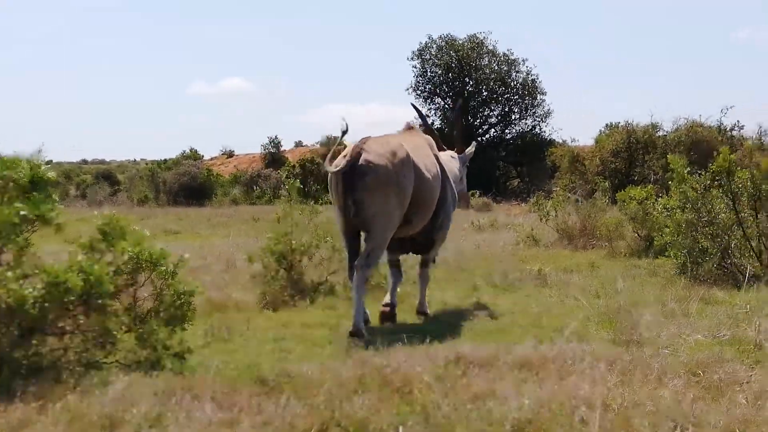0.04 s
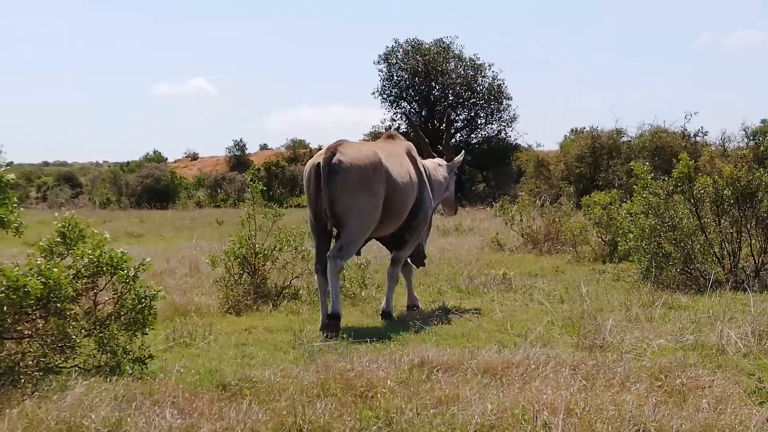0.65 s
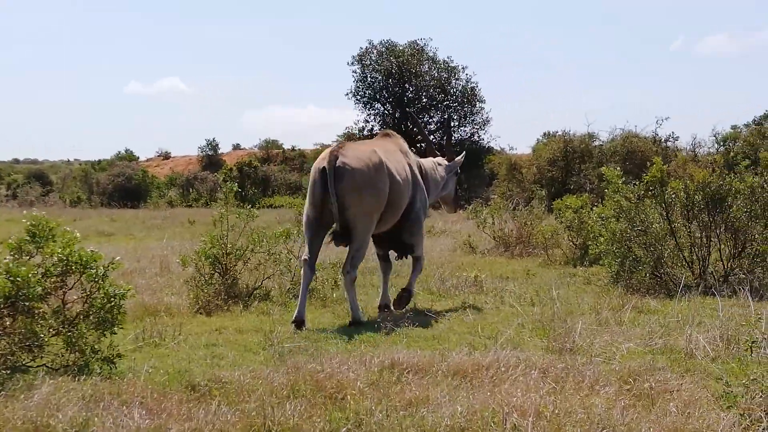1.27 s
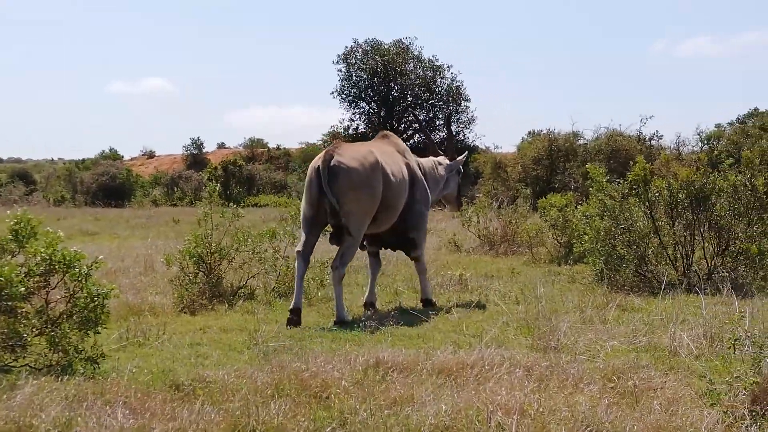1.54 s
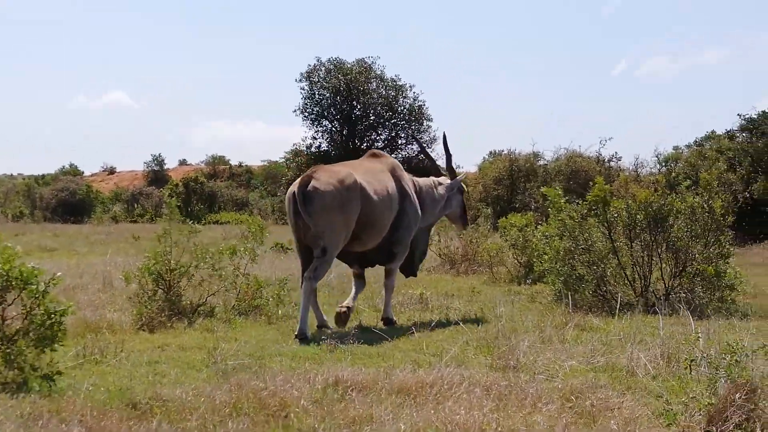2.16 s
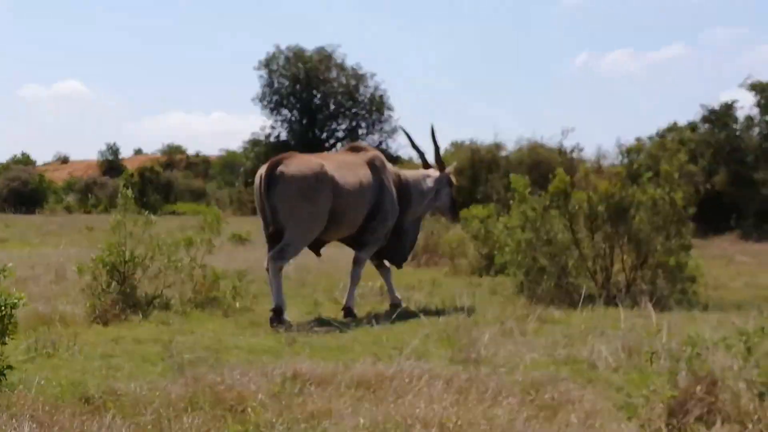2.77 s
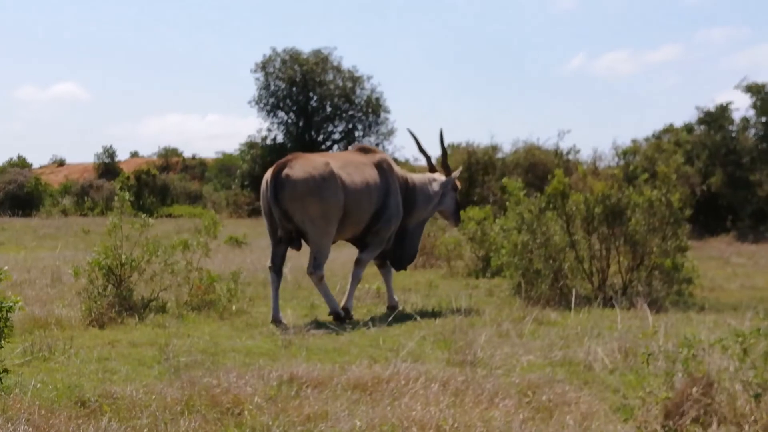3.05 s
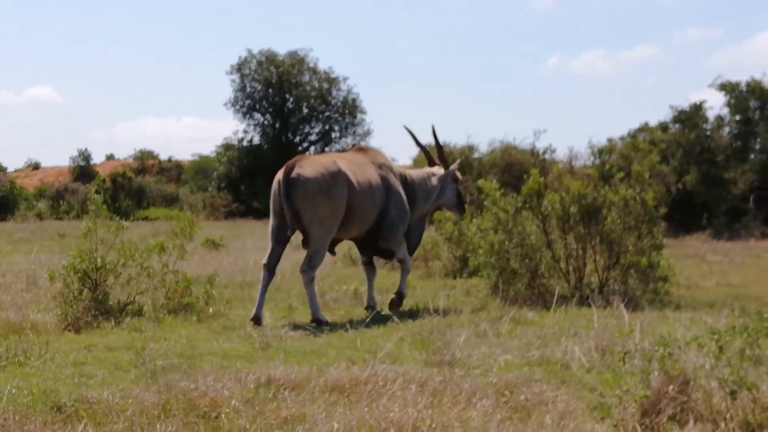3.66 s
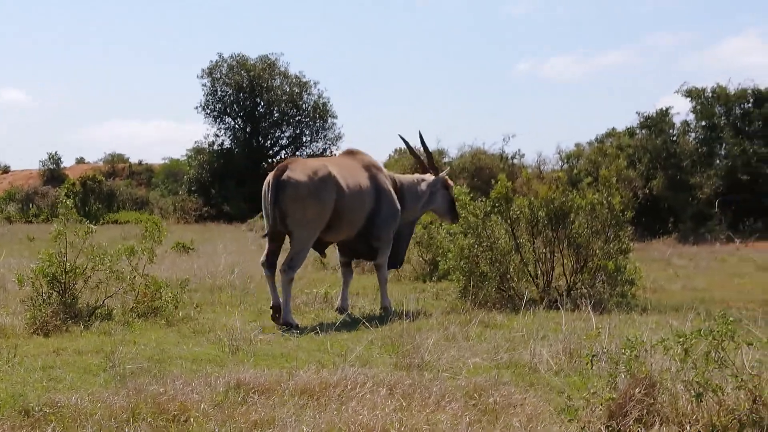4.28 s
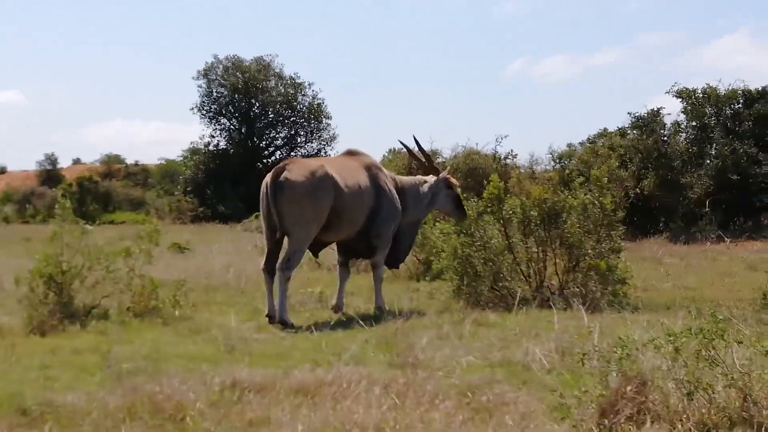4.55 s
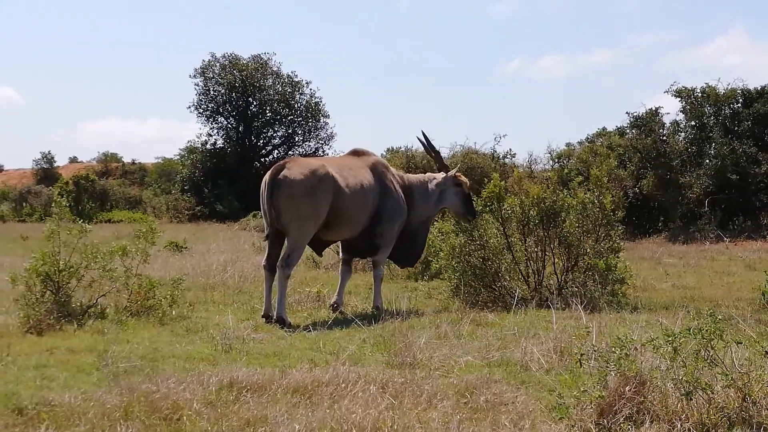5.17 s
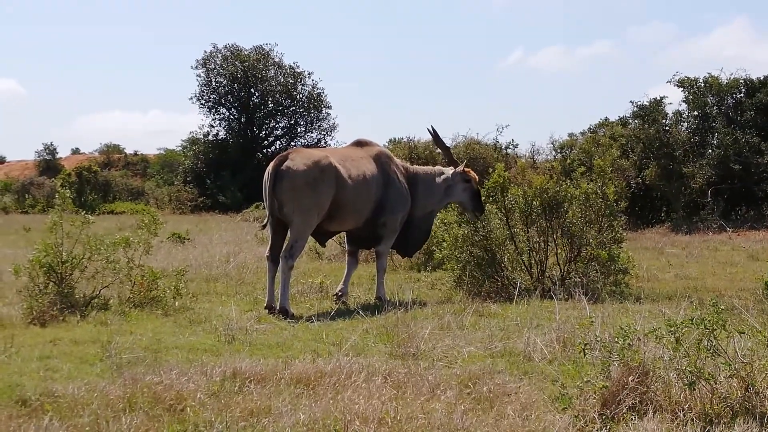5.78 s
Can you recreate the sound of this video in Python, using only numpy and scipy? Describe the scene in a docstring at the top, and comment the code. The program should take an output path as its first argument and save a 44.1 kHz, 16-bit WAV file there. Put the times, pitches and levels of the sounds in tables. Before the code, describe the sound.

A large antelope walks through quiet bushland under a steady hush and light wind rumble. Its leg joints give sharp, dry clicks, each a hollow knock with a bright crack, at about 0.1, 1.1, 2.1 and 3.5 seconds; the second and fourth are the strongest. Duller knocks come at 3.1 and 5.1 seconds. A faint insect ticks very high and fast on the left throughout, wavering in level. Grass swishes softly against the legs, mostly in the first second and a half, and hooves faintly pat the turf and snap stalks. Leaves rustle very faintly around 2 seconds. A low gust thumps the microphone at about 2.3 seconds, with smaller bumps between 4 and 5. From 5.3 seconds to the end, wind buffets the microphone hard, and one short, dry scuff sounds close by at 5.6.

```python
"""A large antelope walks away through dry bushland. From the start, over a steady hush, light wind rumbles
at the microphones, grass rubs along the legs and an insect's wing strokes tick high and fast on the left.
A tendon snaps over each foreleg joint as it takes the weight, exciting the leg's damped modes; hooves pat
the turf and break stalks. Leaves rustle softly around 2 s. Near the end turbulent eddies buffet the
microphones hard, and one dry scuff sounds close by."""
import sys
import numpy as np
from scipy import signal
from scipy.fft import rfft, irfft, next_fast_len
from scipy.io import wavfile
from scipy.ndimage import uniform_filter1d

SR = 44100
rng = np.random.default_rng(int(sys.argv[2]) if len(sys.argv) > 2 else 0)


def wav_record(signal):
    """Record a signal, one row per channel, as 16-bit PCM in the file named by sys.argv[1]."""
    frames = np.transpose(np.atleast_2d(signal))
    bounded = np.clip(frames, -1, 1)
    # unit amplitude maps onto the largest positive 16-bit level
    quanta = np.round(bounded * 32767).astype(np.int16)
    wavfile.write(sys.argv[1], SR, quanta)


N = 261072
T = np.arange(N) / SR


def amp(db):
    """Amplitude ratio of a level in decibels."""
    return 10 ** (np.asarray(db) / 20)


def unit(x):
    """Normalisation to rms 1."""
    return x / np.sqrt(np.mean(x ** 2) + 1e-20)


def spectrum_at(points, hz):
    """Interpolation on a logarithmic frequency axis."""
    frequencies, values = np.transpose(points)
    return np.interp(np.log(hz + 1), np.log(frequencies + 1), values)


def panned(db):
    """Channel gains for a level difference, left minus right."""
    return amp(np.array([[db], [-db]]) / 2)


def add(mix, start, sound):
    """Superposition of a sound on the mix from a start time in seconds."""
    part = mix[:, max(round(start * SR), 0):][:, :sound.shape[1]]
    part += sound[:, :part.shape[1]]


def noise_pair(correlation, size=N):
    """Two channels of white noise with a given correlation."""
    a, b = rng.standard_normal((2, size))
    return np.array([a, correlation * a + np.sqrt(1 - correlation ** 2) * b])


def filtered(x, response):
    """Linear filtering: the spectrum is multiplied by a frequency response."""
    size = next_fast_len(x.shape[-1], real=True)
    hz = np.fft.rfftfreq(size, 1 / SR)
    return irfft(rfft(x, size) * response(hz), size)[..., :x.shape[-1]]


def hiss(spectrum, correlation, size=N):
    """Spectrally shaped stereo noise of rms 1."""
    return unit(filtered(noise_pair(correlation, size), lambda hz: amp(spectrum_at(spectrum, hz))))


def drift(bandwidth_hz):
    """Random modulation of rms 1, lying mostly below the given frequency."""
    points = rng.standard_normal(4096)
    return unit(np.interp(T * bandwidth_hz * 2, np.arange(len(points)), points))


def burst(rise, decay, size):
    """Envelope of linear attack and exponential decay, both in seconds."""
    t = np.arange(size) / SR
    return np.minimum(t / rise, 1) * np.exp(-np.maximum(t - rise, 0) / decay)


# Distant hush: (frequency [Hz], relative level [dB])
AIR_SPECTRUM = [(120, 3), (200, 4), (350, -3.5), (600, -10.5), (900, -7), (1300, -6), (2000, -8),
                (2600, -11), (3300, -8.5), (5000, -11), (7500, -12), (10200, -8), (12500, -15),
                (16000, -19.5)]


def air(level_db=-64.5, waver_db=0.35):
    """Diffuse field: the hush of open country is almost uncorrelated between the channels."""
    return amp(level_db + waver_db * drift(1.17)) * hiss(AIR_SPECTRUM, 0.073)


def eddies(corner_hz, size=N, slope=4.61, low_hz=40, lag_rad=2.49, lag_hz=260):
    """Turbulent pressure falls steeply above a corner frequency and reaches the left port late."""
    def response(hz):
        band = hz / np.hypot(hz, low_hz) / np.hypot(1, (hz / corner_hz) ** slope)
        left_lag = np.exp(-1j * lag_rad * np.tanh(hz / lag_hz))
        return band * np.array([left_lag, np.ones(len(hz))])
    return unit(filtered(noise_pair(1.0, size), response))


# Continuous light breeze: (time [s], relative level [dB])
BREEZE_LEVEL = [(0, -49.5), (.55, -63.5), (1.0, -61), (1.2, -62), (1.8, -63), (2.2, -60.5), (3.15, -63.5),
                (3.7, -54.5), (4.02, -68), (4.6, -61.5), (5.9, -53)]
# Gusts above it: (start [s], duration [s], relative level [dB])
WIND_GUSTS = [(0.017, 0.37, -55.5), (.62, 0.091, -54), (0.743, 0.17, -51.5), (1.279, 0.18, -49.5),
              (2.252, 0.21, -39.5), (2.542, 0.22, -50), (2.947, 0.024, -44), (3.385, 0.2, -55.5),
              (3.844, 0.088, -56), (4.072, 0.3, -45.5), (4.434, 0.29, -52), (4.794, 0.3, -51),
              (5.199, 0.059, -45.5), (5.277, 0.79, -33.5), (5.345, 0.072, -29.5), (5.538, 0.19, -30)]


def wind_force(rise=0.022, fall=0.03, flutter_db=3.0, flutter_hz=14):
    """Incoherent addition: breeze and gusts sum in power to one fluttering level in dB."""
    power = amp(np.interp(T, *np.transpose(BREEZE_LEVEL))) ** 2
    for start, duration, db in WIND_GUSTS:
        onset = np.clip((T - start) / rise, 0, 1)
        release = np.exp(-np.maximum(T - start - duration, 0) / fall)
        power += (amp(db) * onset * release) ** 2
    return 10 * np.log10(power) + flutter_db * drift(flutter_hz)


def wind(gain_db=1.0, calm_hz=88, gust_hz=175):
    """Eddy shedding at the microphones: a harder gust sheds smaller, faster eddies."""
    force_db = wind_force()
    gust_share = np.interp(force_db, [-50, -36, -25], [.05, .2, .75])
    rumble = (1 - gust_share) * eddies(calm_hz) + gust_share * eddies(gust_hz)
    # dividing out the running rms lets the wind's force alone set the loudness
    power = uniform_filter1d(uniform_filter1d((rumble ** 2).mean(0), size=1500), size=1100)
    return amp(force_db + gain_db) * rumble / np.sqrt(power + 1e-9)


# Legs brushing through grass: (start [s], end [s], relative level [dB])
GRASS_STROKES = [(0.0, 0.18, -52), (0.364, 0.536, -56.5), (0.663, 0.79, -59), (0.763, 0.919, -53.5),
                 (0.914, 1.12, -56.5), (1.155, 1.20, -48.5), (1.302, 1.442, -48.5), (1.36, 1.391, -49),
                 (1.817, 2.227, -61), (2.506, 2.604, -54.5), (2.577, 2.833, -56.5), (3.631, 3.726, -52.5),
                 (3.714, 3.918, -57)]
# Sliding blades: (frequency [Hz], relative level [dB])
GRASS_SPECTRUM = [(1500, -24), (4000, -16), (7000, -11), (9000, -2.5), (10300, 4.5), (11500, -3),
                  (13000, -7.5), (16000, -18)]


def grass(gain_db=-6.0, grain_db=3.0, grain_hz=130, pan_db=1):
    """Friction noise: dry blades slide along the legs in small clumps that modulate its level."""
    envelope = np.zeros((1, N))
    for start, end, db in GRASS_STROKES:
        progress = np.arange(0, 1, 1 / ((end - start) * SR))
        add(envelope, start, amp(db) * np.sqrt(np.sin(np.pi * progress))[None])
    friction = unit(hiss(GRASS_SPECTRUM, 0.4) * amp(grain_db * drift(grain_hz)))
    return amp(gain_db) * panned(pan_db) * envelope * friction


# Wing beat: (time [s], stroke rate [Hz])
WING_RATE = [(0, 13.32), (.7, 13.93), (1.15, 13.42), (1.45, 14.43), (2.2, 13.99), (3.4, 15.54),
             (4.1, 14.98), (5.3, 14.87), (5.9, 13.7)]
# The insect flying nearer and farther: (time [s], relative level [dB])
WING_LEVEL = [(0.05, -45), (.2, -51.5), (.5, -43.5), (.9, -52), (1.38, -44.5), (1.8, -58.5), (2.28, -48.5),
              (2.42, -63), (3.3, -60), (4.0, -53.5), (4.25, -48), (4.8, -51.5), (5.85, -58)]


def insect(gain_db=-7, pan_db=5, uneven_db=2.0, first_s=0.066, size=1024):
    """Pulsed resonance: each wing stroke is a brief rasp in one broad band whose pitch slowly sinks."""
    centre_hz, sag_hz_per_s, scatter_hz, width_hz = 10770, 210, 250, 1900
    out, t = np.zeros((2, N)), np.arange(size) / SR
    stroke = np.exp(-((t - 0.0023) / 0.0024) ** 2) + 0.15 * np.exp(-t / 0.0057)
    stroke_rms = np.sqrt(np.mean(stroke ** 2))
    beats = np.cumsum(np.interp(T, *np.transpose(WING_RATE)) * (T > first_s)) / SR
    starts = T[:-1][np.diff(np.ceil(beats)) > 0]
    for start, (force, tuning) in zip(starts, rng.standard_normal((len(starts), 2))):
        db = np.interp(start, *np.transpose(WING_LEVEL)) + uneven_db * force
        pitch = centre_hz - sag_hz_per_s * start + scatter_hz * tuning
        rasp = filtered(noise_pair(0.18, size), lambda hz: 1 / (1 + ((hz - pitch) / width_hz) ** 2) ** 2)
        add(out, start, amp(db + gain_db) * stroke_rms * unit(rasp * stroke))
    return panned(pan_db) * out


# Modes, one list for each foreleg: (frequency [Hz], relative level [dB], 60 dB decay time [s])
FORELEG_MODES = [
    [(1087, -1.5, 0.012), (1310, 1.5, 0.0091), (1590, -7, 0.021), (2130, -6.5, 0.031), (3430, -3.5, 0.011),
     (4210, -3.5, 0.011), (4870, -4, 0.0071), (5860, -4, 0.016), (7620, -3, .016), (8280, 2, 0.012)],
    [(1003, -1, 0.011), (1225, 2, 0.0074), (1644, 4, 0.0067), (1828, 0, 0.015), (2220, -15, 0.013),
     (2950, -11, 0.04), (3320, -3.5, 0.0079), (3930, -8.5, 0.023), (5130, 0, 0.015), (5740, -4.5, 0.014),
     (6830, -5.5, 0.019), (7600, -13, 0.0089)],
]


def knock(t, leg, upper_db, rise=0.0006, split_hz=2300):
    """Modal vibration: the leg's modes swell and decay; a soft snap excites the upper ones weakly."""
    out = np.zeros(len(t))
    for k, (hz, db, t60) in enumerate(FORELEG_MODES[leg]):
        mode_db = db + upper_db / (1 + (split_hz / hz) ** 8)
        out += (-1) ** k * amp(mode_db - 60 * t / t60) * np.sin(2 * np.pi * hz * t)
    return out * (1 - np.exp(-t / rise))


# Rasp of the slipping tendon: (frequency [Hz], relative level [dB])
CRACK_SPECTRUM = [(600, -55), (1000, -1.5), (2500, -10), (4500, -10.5), (7000, -7), (9500, 4),
                  (11000, -6.5), (12500, -10.5), (15500, -14)]


def crack(t, hz, rise=0.00016, sag_s=0.0022):
    """Sudden release of tension: the tendon gives a falling tick, a high ring and a brief rasp."""
    tick_phase = 2 * np.pi * hz * sag_s * np.log1p(t / sag_s)
    tick = t / rise * np.exp(1 - t / rise) * np.sin(tick_phase)
    ring = amp(-9) * np.exp(-t / 0.0022) * np.sin(2 * np.pi * hz * t)
    rasp = amp(-8) * np.exp(-t / 0.0025) * hiss(CRACK_SPECTRUM, 0.94, len(t))
    return tick + ring + rasp


def thud(t, gain_db=-27, decay=0.00072, hz=330):
    """Heavily damped oscillation: the joint's jolt pushes the air once, low and faint."""
    return amp(gain_db) * np.exp(-t / decay) * np.sin(2 * np.pi * hz * t)


def bushes(click, band_hz=(1700, 8000), delay=0.002, size=8000):
    """Scattering: ground and shrubs return a short, thin tail."""
    tail, t = np.zeros((2, size)), np.arange(size) / SR
    for db, t60 in ((-11, 0.064), (-16, 0.12)):  # near, far
        echoes = noise_pair(0.28, size) * amp(-60 * t / t60) * (t > delay)
        tail += amp(db) * echoes / np.linalg.norm(echoes[0])
    thin = signal.sosfilt(signal.butter(1, band_hz, "band", fs=SR, output="sos"), click)
    return signal.fftconvolve(thin, tail, axes=1)[:, :click.shape[1]]


# Tendon snaps: (time [s], leg [0 or 1], knock gain [dB], upper modes re knock [dB], crack gain [dB],
# crack frequency [Hz], left minus right [dB], lower cutoff [Hz], upper cutoff [Hz])
KNEE_CLICKS = [(0.1018, 0, -30, 1, -20.5, 9570, -1, 930, 15100),
               (1.1327, 1, -23.5, -4, -15, 10640, 0, 920, 12600),
               (2.1424, 0, -37.5, 8.5, -20.5, 8900, 1, 1210, 12200),
               (3.1440, 1, -33, -15.5, -48, 6040, -0.5, 1180, 3950),
               (3.4738, 1, -25.5, -0.5, -16.5, 9270, -0.5, 955, 11100),
               (5.1456, 1, -28, -32, -71, 8000, -3, 1530, 1900)]


def knees(size=8192):
    """Impulsive excitation: each tendon snap sounds a hollow knock under a bright crack."""
    out, t = np.zeros((2, N)), np.arange(size) / SR
    for start, leg, knock_db, upper_db, crack_db, hz, pan_db, low_hz, top_hz in KNEE_CLICKS:
        # a slim leg radiates little bass, and a slow snap little treble
        highpass = signal.butter(6, low_hz, "high", fs=SR, output="sos")
        lowpass = signal.butter(3, top_hz, fs=SR, output="sos")
        vibration = amp(knock_db) * knock(t, leg, upper_db) + amp(crack_db) * crack(t, hz)
        click = panned(pan_db) * signal.sosfilt(np.vstack([highpass, lowpass]), vibration)
        add(out, start, click + bushes(click) + amp(crack_db) * thud(t))
    return out


# Single eddies: (centre time [s], relative level [dB], 1/e half-width [s], corner frequency [Hz])
EDDY_STRIKES = [(0.153, -41, 0.015, 100), (0.266, -35.5, 0.0087, 146), (1.396, -34.5, 0.014, 124),
                (2.29, -29, 0.013, 108), (2.339, -41, 0.017, 225), (2.411, -23.5, 0.011, 180),
                (2.638, -38, 0.011, 121), (3.542, -34, 0.027, 145), (4.196, -37.5, .016, 125),
                (4.611, -33.5, 0.01, 149), (4.68, -27, 0.01, 140), (4.873, -37, 0.011, 158),
                (5.369, -17.5, 0.011, 234), (5.404, -19.5, 0.012, 245), (5.436, -17.5, 0.0073, 256),
                (5.505, -21.5, 0.0091, 194), (5.586, -30, 0.074, 256), (5.677, -24, 0.022, 200),
                (5.760, -26, 0.017, 263)]


def buffets(gain_db=-1.0, tearing_db=-23, tearing_range_db=4, flurry_db=-29, flurry_hz=620, size=8192):
    """Pressure pulses: eddies slap the microphone ports, and the hardest tear into finer turbulence."""
    out, t = np.zeros((2, N)), (np.arange(size) - size // 2) / SR
    for centre, db, half_width, corner_hz in EDDY_STRIKES:
        swell = np.exp(-(t / half_width) ** 2)
        swell_rms = np.sqrt(np.mean(swell ** 2))
        torn = np.clip((db - tearing_db) / tearing_range_db, 0, 1)
        eddy = eddies(corner_hz, size) + torn * amp(flurry_db) * eddies(flurry_hz, size)
        add(out, centre + t[0], amp(db + gain_db) * swell_rms * unit(swell * eddy))
    return out


# Footfalls: (time [s], relative pat level [dB], snap level [dB], decay time [s])
HOOF_STEPS = [(0.305, -68, -59.5, 0.0044), (0.567, -59, -74, 0.013), (0.696, -53.5, -57, 0.0028),
              (1.585, -63, -69, 0.022), (1.661, -61, -69, 0.011), (1.885, -62, -63.5, 0.018),
              (2.278, -61.5, -81, .012), (2.437, -78, -53, 0.002), (2.637, -64, -60, .004),
              (3.721, -62, -67, 0.031), (4.334, -65, -65, 0.029), (4.879, -67, -65, .004),
              (5.104, -62, -68, 0.042), (5.138, -53.5, -75, 0.0067), (5.697, -58.5, -73, 0.019)]
# Dull noise of turf, also used for leaves: (frequency [Hz], relative level [dB])
DULL_SPECTRUM = [(400, -14.5), (900, -8.5), (1300, 0), (1800, -5.5), (2500, -15.5), (6000, -24)]
# Snapping dry stalks: (frequency [Hz], relative level [dB])
STALK_SPECTRUM = [(1000, -18), (2500, -5), (4500, -6), (8000, -6.5), (11000, -4), (15000, -26)]


def hooves(pat_gain_db=-2, rise=0.0039, size=4096):
    """Damped impact and brittle fracture: each step pats the turf and snaps stalks."""
    out = np.zeros((2, N))
    for start, pat_db, snap_db, decay in HOOF_STEPS:
        pat = amp(pat_db + pat_gain_db) * hiss(DULL_SPECTRUM, 0.66, size)
        snap = amp(snap_db) * hiss(STALK_SPECTRUM, 0.28, size)
        add(out, start, burst(rise, decay, size) * (pat + snap))
    return out


def leaves(level_db=-76.0, peak_s=1.97, half_width=0.62):
    """Amplitude-modulated noise: a soft, low rustle swells and fades."""
    swell = np.exp(-((T - peak_s) / half_width) ** 2)
    return amp(level_db) * swell * hiss(DULL_SPECTRUM, 0.49)


# Close, dry scrape: (frequency [Hz], relative level [dB])
SCUFF_SPECTRUM = [(600, -19), (2000, -15), (2500, -3), (3200, -3.5), (4000, -10), (5200, -15), (7000, -4.5),
                  (8000, -7.5), (9600, 0), (11000, -4), (13000, -14), (15500, -27)]


def scuff(start=5.6418, rise=0.0072, decay=0.0115, level_db=-34.6, size=6000):
    """Friction and resonance: a short, dry scrape leaves a narrow band ringing."""
    ring_hz, width_hz, ring_db, ring_decay = 3100, 400, -18, 0.028
    scrape = burst(rise, decay, size) * hiss(SCUFF_SPECTRUM, 0.19, size)
    band = filtered(noise_pair(0.78, size), lambda hz: np.exp(-((hz - ring_hz) / width_hz) ** 2))
    ring = burst(rise, ring_decay, size) * unit(band)
    out = np.zeros((2, N))
    add(out, start, amp(level_db) * (scrape + amp(ring_db) * ring))
    return out


def scene():
    """Superposition: the pressures from weather, animal and insect add."""
    return air() + wind() + grass() + insect() + knees() + buffets() + hooves() + leaves() + scuff()


# Level difference of the microphones: (frequency [Hz], left minus right [dB])
MIC_BALANCE = [(300, 0), (700, -1), (1200, -1), (2000, -2), (3500, -.5), (6000, 1), (8500, 0.5),
               (10300, 4.5), (13000, -1)]
# Their phase difference: (frequency [Hz], lead of the left [rad])
MIC_PHASE_LEAD = [(300, 0.21), (1200, 0.62), (2500, 1), (5000, 0.89), (10000, 0.95)]


def record(dry, cutoff_hz=15900):
    """Frequency response: the two microphones differ in gain and phase and share one band limit."""
    sides = np.array([[.5], [-.5]])

    def response(hz):
        gain = amp(sides * spectrum_at(MIC_BALANCE, hz))
        return gain * np.exp(1j * sides * spectrum_at(MIC_PHASE_LEAD, hz))
    lowpass = signal.firwin(511, cutoff_hz, window=("kaiser", 9), fs=SR)
    return signal.oaconvolve(filtered(dry, response), lowpass[None], "same")


dry = scene()
out = record(dry)
wav_record(out)
```